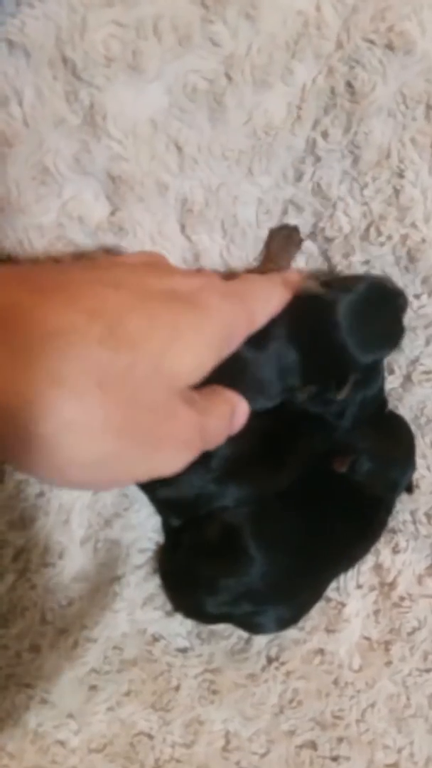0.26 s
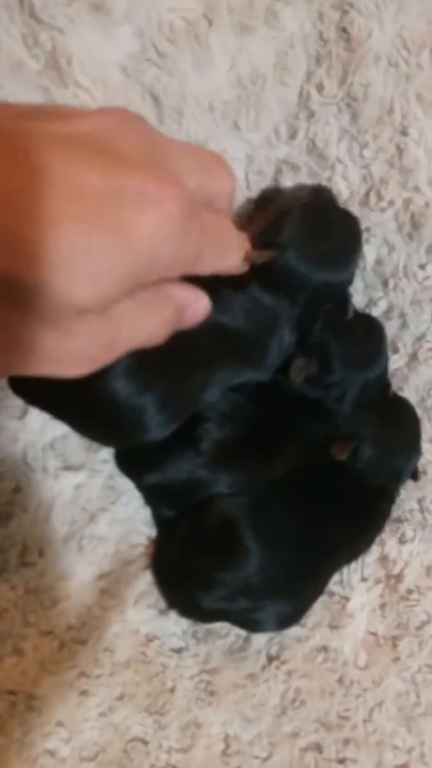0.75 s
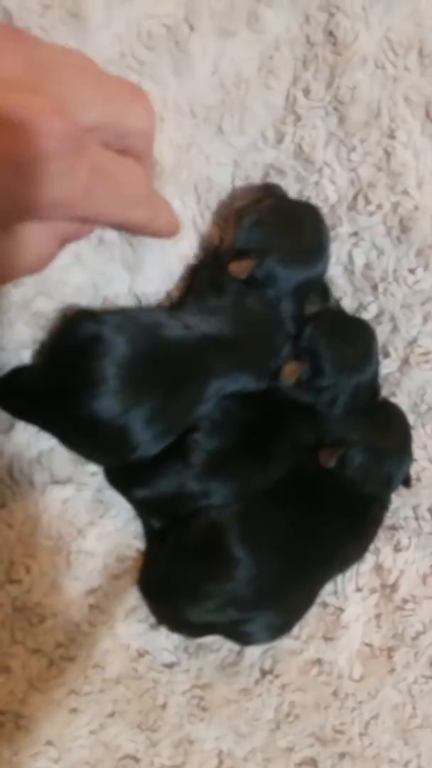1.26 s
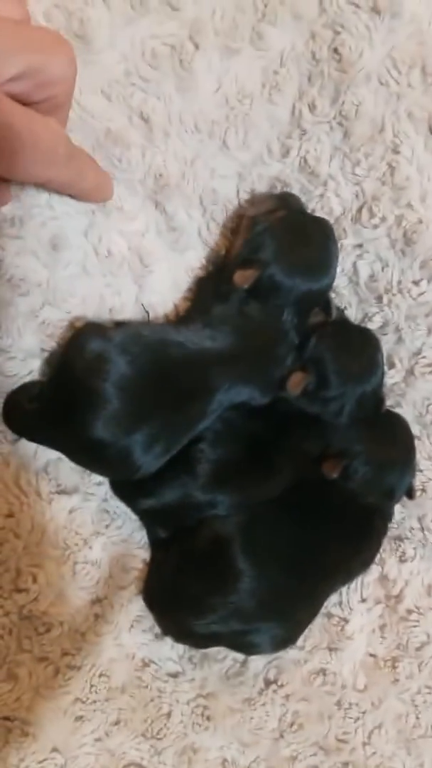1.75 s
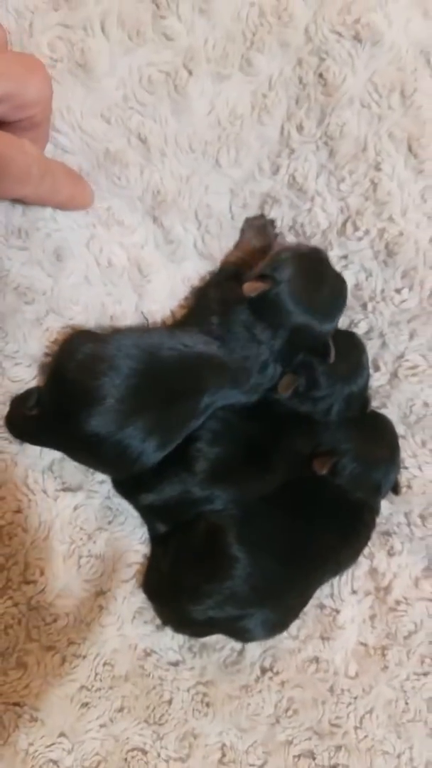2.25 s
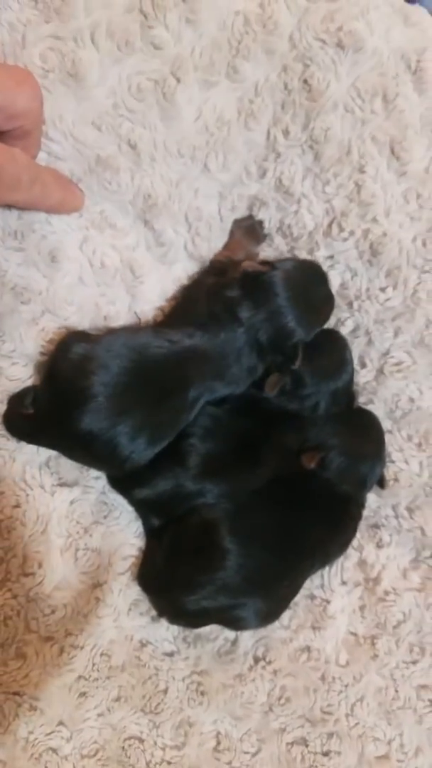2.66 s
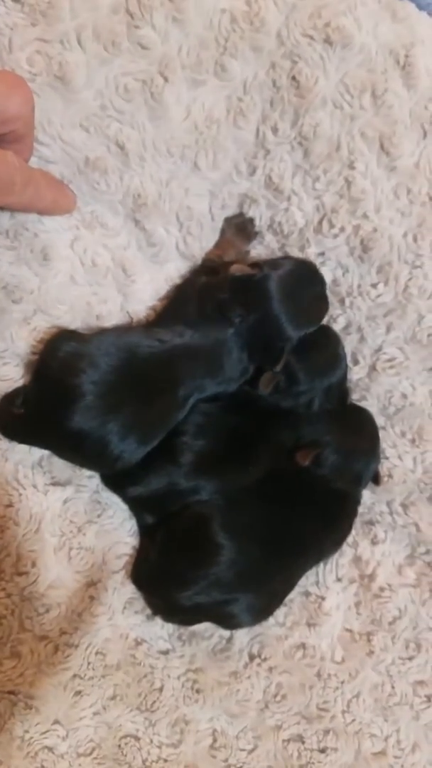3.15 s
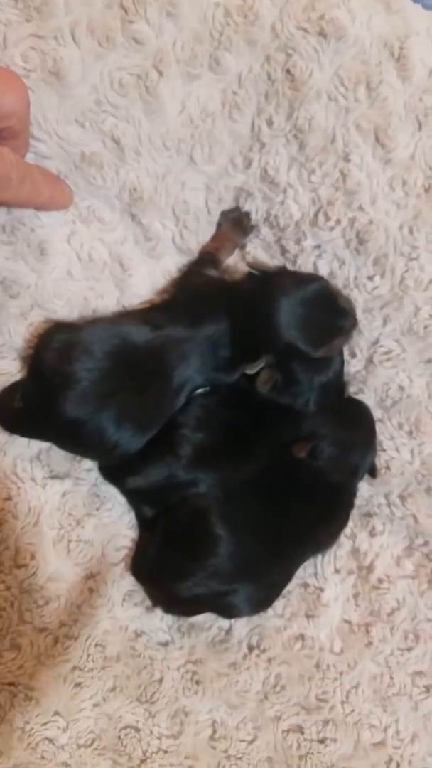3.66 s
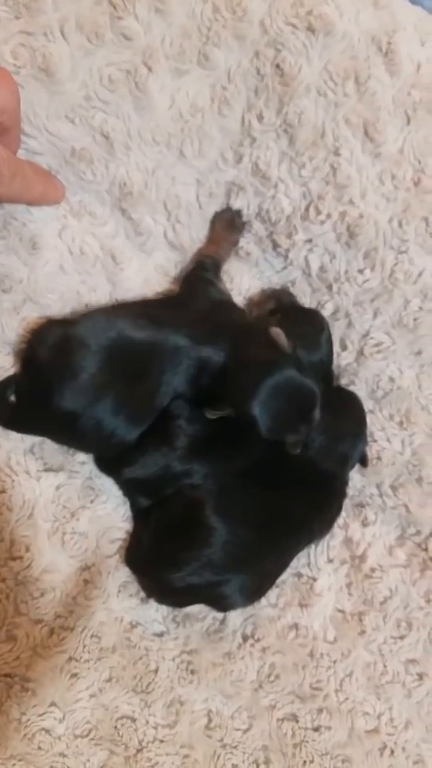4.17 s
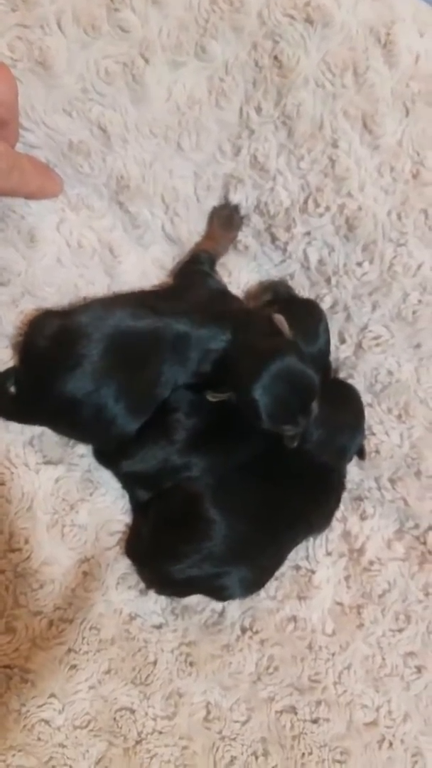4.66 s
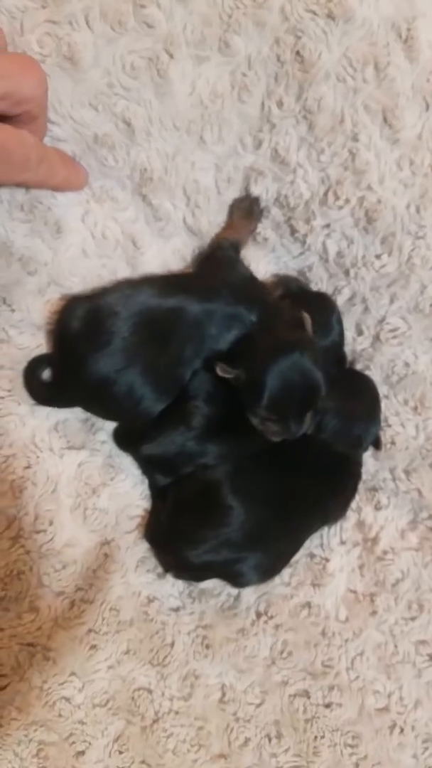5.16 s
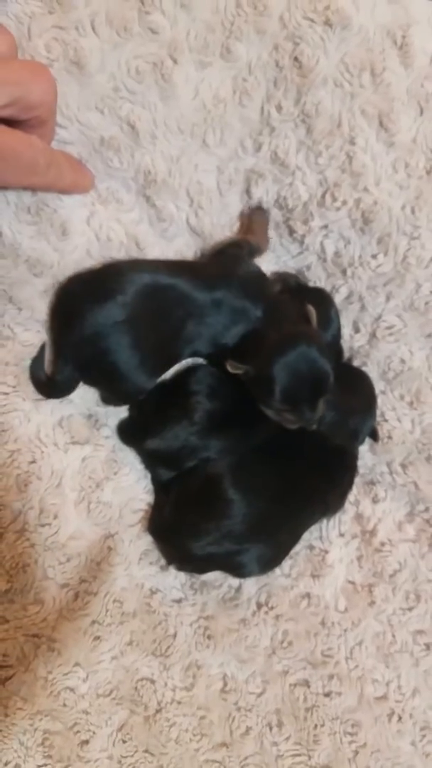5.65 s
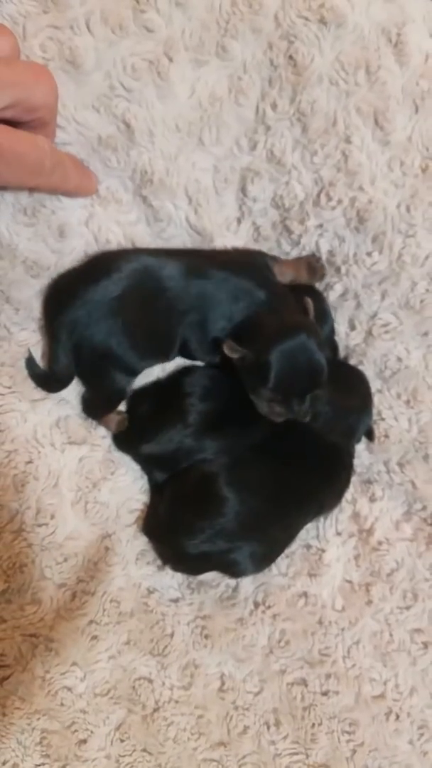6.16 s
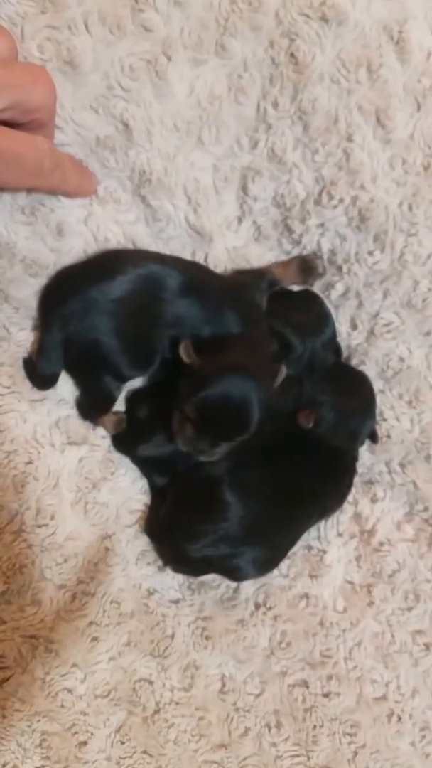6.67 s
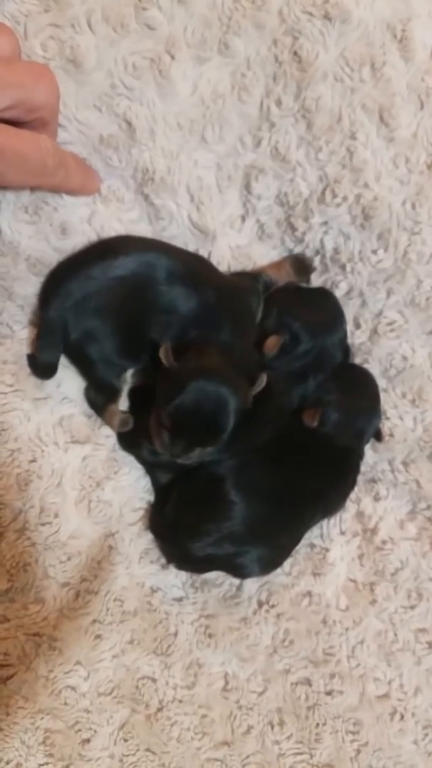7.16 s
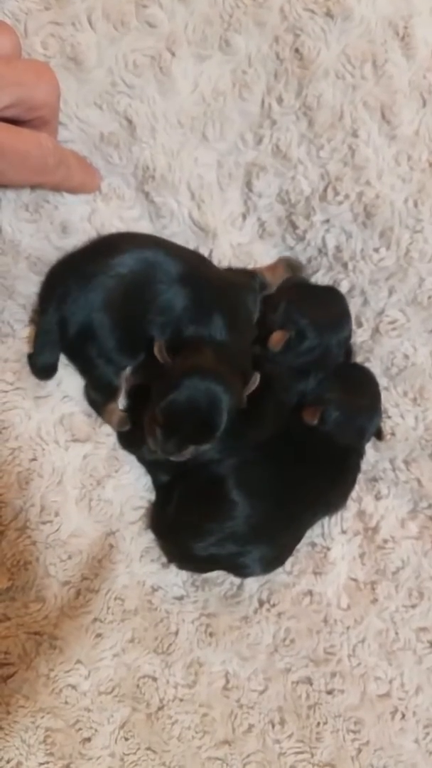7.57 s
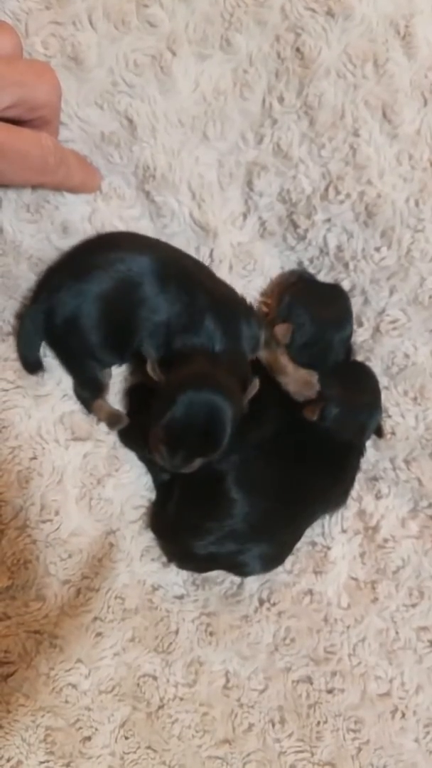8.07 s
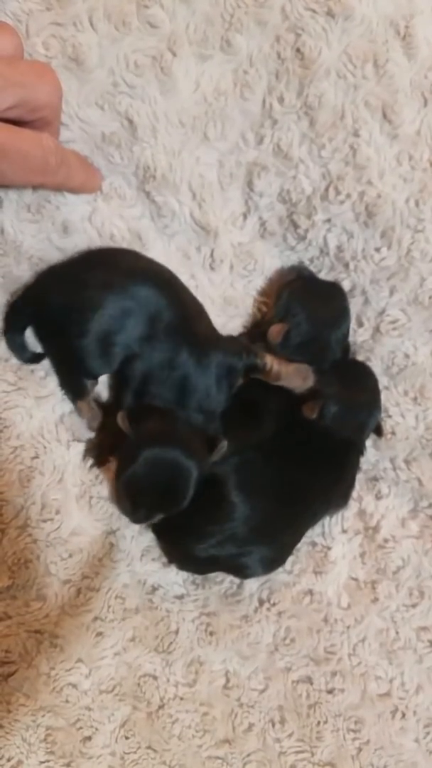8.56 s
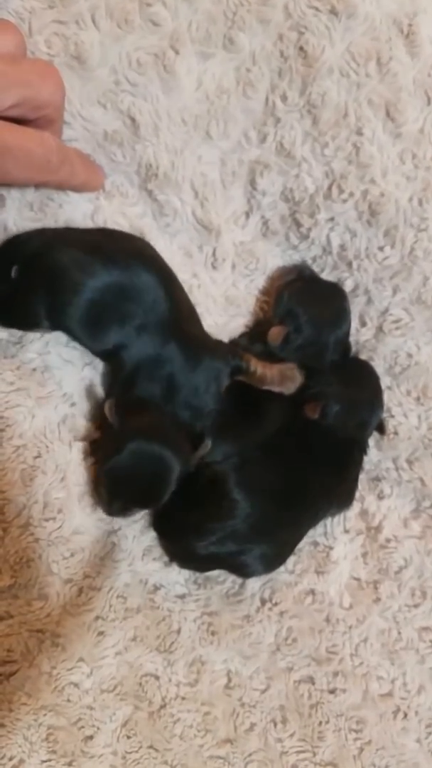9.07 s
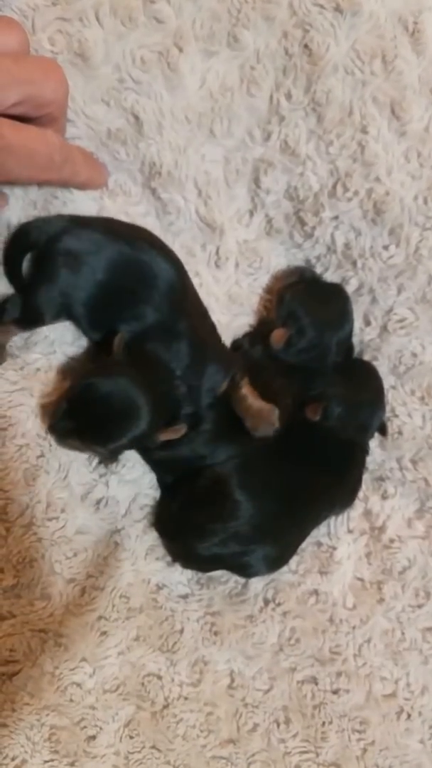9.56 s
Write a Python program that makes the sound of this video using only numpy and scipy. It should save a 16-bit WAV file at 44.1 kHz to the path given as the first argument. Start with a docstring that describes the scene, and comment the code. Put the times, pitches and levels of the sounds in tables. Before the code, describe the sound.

A newborn puppy is heard close up in a carpeted room with a short soft echo. From 0 to 2.8 s a hand brushes fur in light, uneven strokes, with clusters of small dull ticks from fingers on the handheld device, stronger on the right. The puppy gives faint, brief whimpers, then two trembling rising whines at 1.6 and 2.1 s. Quiet broken peeps follow from 3 to 5 s; a distant dog gives one reverberant bark at 3.3 s, and ticks return around 4.8-5.2 s. At 5.3 s a louder quavering cry begins, then a piercing upward squeal at 5.9-6.1 s. Further bark at 6.4 s, overlapping another whine. From 7.2 s strong arched cries come about twice a second, with tiny wet lip clicks between some. A last far bark sounds at 8.9 s; a fluttering whine ends near 9.8 s over slightly rising room rumble and hiss.

```python
"""A newborn puppy whimpers on a carpet just below a hand-held phone: short quavering cries, then louder arched ones.
Each cry is a source and a filter: puffs of air at the pitch of the vocal folds, coloured by an opening and shutting mouth.
A hand strokes the fur and lips click nearby, as filtered noise and damped tones; finger ticks on the phone are short pulses.
A grown dog barks three times from another room, mostly as reverberation built from decaying noise.
The room answers the cries, and its own tone is shaped noise over wavering hum."""
import sys
import numpy as np
from scipy import signal
from scipy.fft import rfft, irfft, next_fast_len
from scipy.io import wavfile
from scipy.ndimage import uniform_filter1d, map_coordinates

SR = 44100
rng = np.random.default_rng(int(sys.argv[2]) if len(sys.argv) > 2 else 0)


def put_to_file(sound):
    """Save the sound as 16-bit audio at rate SR, in the file named by the first command-line argument."""
    columns = np.atleast_2d(sound).T  # one column per channel
    safe = np.clip(columns, -1, 1)
    whole_steps = np.round(safe * 32767)
    wavfile.write(sys.argv[1], SR, whole_steps.astype(np.int16))


N = 433062
T = np.arange(N) / SR  # time in seconds


def amp(db):
    """The decibel law: pressure ratio of a level in dB."""
    return 10 ** (np.asarray(db) / 20)


def unit(x):
    """Normalisation by mean power: x at rms 1."""
    return x / np.sqrt(np.mean(x ** 2) + 1e-20)


def along(points, hz):
    """Linear interpolation of (Hz, value) points on a logarithmic frequency axis."""
    f, v = np.transpose(points)
    return np.interp(np.log(hz + 1), np.log(f + 1), v)


def wobble(rate):
    """Slow random fluctuation: a spline through normal random knots, rate of them a second."""
    coarse = T[::16]
    knots = rng.standard_normal(int(N * rate / SR) + 4)
    return np.interp(T, coarse, map_coordinates(knots, [coarse * rate]))


def filtered(x, response):
    """Linear filtering: the spectrum of x times a complex response of frequency."""
    m = next_fast_len(N + SR // 2)
    hz = np.fft.rfftfreq(m, 1 / SR)
    return irfft(rfft(x, m) * response(hz), m)[..., :N]


def causal(points):
    """Minimum phase: folding the cepstrum of (Hz, dB) points gives a response that never precedes its cause."""
    def response(hz):
        cepstrum = irfft(np.log(amp(along(points, hz))))
        half = len(cepstrum) // 2
        cepstrum[1:half] *= 2
        cepstrum[half + 1:] = 0
        return np.exp(rfft(cepstrum))
    return response


def steady(x, seconds):
    """Level equalisation: x divided by its running rms."""
    power = abs(uniform_filter1d(x ** 2, int(seconds * SR)))
    return x / np.sqrt(power + 1e-12)


def tail(t60_scale):
    """Diffuse reverberation: stereo noise decaying exponentially at its own speed in each band, unit energy on the left."""
    # Each row: frequency in Hz, time in seconds to fall 60 dB, before t60_scale.
    decay_times = [(300, 0.6), (3000, 0.45), (15000, 0.79)]
    hz, t, z = signal.stft(rng.standard_normal((2, SR // 2)), SR, nperseg=256)
    t60 = t60_scale * along(decay_times, hz)[:, None]
    ring = signal.istft(z * amp(-60 * t / t60), SR, nperseg=256)[1]
    return ring / np.linalg.norm(ring[0])


def room_tone():
    """Partly coherent noise: rumble and hiss, least alike at the two ports in the treble, over a wavering hum."""
    # Spectrum of the air noise. Each row: frequency in Hz, relative density in dB per Hz.
    air_colour = [(20, -50), (45, -19.5), (80, -12), (316, -10.5), (1780, -13.5), (3680, -19),
                  (6000, -22.5), (7800, -18.5), (10000, -23.5), (15700, -22)]
    # Course of the noise. Each row: time in seconds, rumble level in dB (60-200 Hz), hiss level in dB (5-12 kHz).
    air_level = [(0, -78, -75), (6, -75.5, -75), (9.82, -69, -71.5)]
    # Left-right coherence. Each row: frequency in Hz, correlation from 0 to 1.
    likeness = [(60, 0.72), (200, 0.55), (640, 0.6), (3000, .01)]
    # An appliance. Each row: frequency in Hz, nominal level in dB (shifted and wavering below).
    hum_tones = [(75, -81.5), (105, -78), (257, -75.5)]

    def mid_and_side(hz):
        # the cosine of twice this angle is the correlation of left and right
        angle = np.arccos(np.clip(along(likeness, hz), -1, 1)) / 2
        return amp(along(air_colour, hz)) * [np.cos(angle), np.sin(angle)]

    mid, side = filtered(rng.standard_normal((2, N)), mid_and_side)
    pair = np.array([mid + side, mid - side])
    low = filtered(pair, lambda hz: 1 / (1 + (hz / 300) ** 2))

    def band_rms(lo, hi):
        """Mean power of the noise pair between two frequencies in Hz, as an rms."""
        return np.std(filtered(pair, lambda hz: (hz > lo) & (hz < hi)))

    s, rumble_db, hiss_db = np.transpose(air_level)
    rumble = low / band_rms(60, 200) * amp(np.interp(T, s, rumble_db) + .8 * wobble(4))
    hiss = (pair - low) / band_rms(5000, 12000) * amp(np.interp(T, s, hiss_db) + .6 * wobble(3))
    hum = np.zeros(N)
    for hz, db in hum_tones:
        level = amp(db - 3.5 + 5.9 * wobble(12))
        hum += level * np.sin(2 * np.pi * hz * T + 1.3 * wobble(5.4))
    return rumble + hiss + hum


def rustle():
    """Friction noise: a hand strokes the puppy's fur in uneven strokes."""
    # Spectrum of the friction. Each row: frequency in Hz, relative density in dB per Hz.
    fur = [(700, -8.5), (2300, -2), (3700, -7), (6000, -11.5), (7900, -6.5), (15700, -26)]
    # Strength of the stroking. Each row: time in seconds, mean level in dB.
    strokes = [(0, -71), (.3, -77), (.6, -64), (.8, -76.5), (1.1, -71.5), (1.45, -65.5), (1.9, -73),
               (2.4, -61.5), (2.8, -99)]
    rub = unit(filtered(rng.standard_normal((2, N)), lambda hz: amp(along(fur, hz))))
    return rub * amp(np.interp(T, *np.transpose(strokes)) + 1.2 * wobble(3.7))


def folds(pitch_hz, fall, uneven_db, noisy, count):
    """Glottal source: harmonics each weaker by fall, blended with noise gated once a cycle."""
    turn = np.exp(2j * np.pi * np.cumsum(pitch_hz) / SR)
    drift = [amp(uneven_db * wobble(30)) for _ in range(5)]
    partial, puffs = turn, np.zeros(N)
    for k in range(1, count):
        puffs += partial.real * drift[k % len(drift)] * (k * pitch_hz < 16000)
        partial = partial * turn * fall
    gate = (.5 + .5 * turn.real) ** 2
    noise = 13.0 * gate * rng.standard_normal(N)
    return (1 - noisy) * puffs + noisy * noise, noise


def quaver():
    """Frequency modulation: the share by which the pitch swings about its contour."""
    # Spells of trembling pitch. Each row: start in seconds, end in seconds, time of a crest in seconds,
    # period in seconds, first swing and last swing as shares of the pitch.
    spells = [(1.627, 1.812, 1.642, .0513, .11, .07), (2.085, 2.36, 2.122, .051, 0.22, .05),
              (5.367, 5.619, 5.4, .049, 0.1, 0.08946), (6.416, 6.581, 6.432, .057, 0.1296, 0.067),
              (7.26, 7.461, 7.288, .053, .09, 0.067), (9.586, 9.775, 9.598, .053, .06, .1)]
    fade_s = .012
    swing = np.zeros(N)
    for start, end, crest, period, first, last in spells:
        fade = np.clip(np.minimum(T - start, end - T) / fade_s, 0, 1)
        depth = np.interp(T, [start, end], [first, last])
        swing += fade * depth * np.cos(2 * np.pi * (T - crest) / period)
    return swing


def puppy():
    """Source and filter: puffs at the pitch pass a mouth that opens and shuts; fold buzz and breath hiss above."""
    # One list per cry, without its quaver. Each row: time in seconds, fold pitch in Hz, level in dB.
    contours = [
        [(.053, 391.6, -49.5), (.078, 359, -51.5), (.127, 437, -46.5), (.152, 429, -52.5)],
        [(.435, 475.6, -59), (.46, 412, -52.5), (.5, 337.6, -49), (.54, 418.6, -46), (.56, 414.4, -47.5),
         (.593, 462.5, -43), (.609, 451, -55), (.62, 466, -46)],
        [(.918, 356, -52.5), (.958, 338.3, -52.5), (.97, 376.6, -52.5), (.99, 355, -53.5), (1.006, 366, -52)],
        [(1.6, 374.4, -62.5), (1.634, 395, -53), (1.7, 398.7, -46), (1.744, 455, -41), (1.81, 510.6, -42.5),
         (1.826, 400, -43), (1.85, 332, -49.5)],
        [(2.08, 330, -54), (2.122, 445, -47.5), (2.18, 505.5, -42), (2.256, 570.6, -38), (2.348, 627, -37.5),
         (2.362, 594, -39), (2.378, 534, -49)],
        [(2.955, 540, -54.5), (2.977, 490, -54.5), (3.001, 491, -55.5), (3.021, 404, -52),
         (3.059, 507.6, -48.5), (3.073, 478, -51.5), (3.087, 450, -67)],
        [(3.36, 420, -58), (3.385, 394, -56.5), (3.4, 436, -50), (3.424, 429, -53.5), (3.475, 354, -52.5),
         (3.5, 334.5, -57)],
        [(4.102, 902, -51.5), (4.156, 957, -56.5), (4.16, 467, -52), (4.206, 449, -52.5), (4.238, 393.5, -47.5),
         (4.256, 331.3, -48.5), (4.272, 340, -74)],
        [(4.53, 913, -51), (4.554, 893, -52), (4.558, 548, -51), (4.578, 471, -50.5), (4.62, 407.4, -46),
         (4.664, 438, -43.5), (4.684, 397, -45.5), (4.705, 372, -54)],
        [(4.975, 910, -54), (4.998, 862, -53.5), (5.016, 538, -55), (5.04, 739, -69)],
        [(5.315, 600, -53), (5.33, 523.3, -49.5), (5.35, 479.5, -44.5), (5.387, 420.7, -39.5),
         (5.423, 425, -38.5), (5.501, 475.5, -32.5), (5.593, 494.8, -31), (5.62, 473, -43.5)],
        [(5.853, 798, -45.5), (5.877, 834, -31.5), (5.899, 990, -32), (5.977, 1472, -24.5), (6.065, 1637, -19),
         (6.083, 1499, -28), (6.105, 1054, -32), (6.119, 1050, -29.5), (6.14, 848, -36)],
        [(6.338, 326, -42), (6.358, 410.7, -44.5), (6.378, 403.3, -37.5), (6.415, 492.4, -36),
         (6.44, 459.2, -35.5), (6.604, 471.8, -32.5), (6.646, 567.7, -31.5), (6.675, 408.5, -46)],
        [(6.925, 406, -48.5), (6.943, 418, -44), (6.978, 382.8, -43.5), (7.0, 415.7, -54.5)],
        [(7.242, 468, -43.5), (7.254, 457, -50), (7.29, 442, -41.5), (7.36, 510, -37), (7.452, 549.7, -33.5),
         (7.478, 570.5, -31), (7.496, 456.5, -46.5), (7.515, 411, -41)],
        [(7.7, 504, -50), (7.71, 496, -59.5), (7.734, 582, -39.5), (7.762, 668, -38), (7.784, 811, -34.5),
         (7.826, 871.5, -27.5), (7.88, 564.6, -31.5), (7.928, 398.5, -45)],
        [(8.115, 676, -50.5), (8.142, 626, -41), (8.159, 743, -35.5), (8.215, 851.5, -26), (8.249, 714, -30.5),
         (8.279, 550.6, -32.5), (8.33, 483.7, -38.5), (8.352, 505, -49)],
        [(8.553, 475, -51.5), (8.579, 516.4, -48), (8.607, 515, -43.5), (8.629, 750, -36.5), (8.679, 834, -30),
         (8.709, 787, -30.5), (8.742, 684, -29.5), (8.767, 491.6, -41), (8.79, 507, -58)],
        [(9.0, 434, -47), (9.056, 796, -32), (9.1, 955, -27.5), (9.132, 1019, -29), (9.156, 1201, -35.5),
         (9.176, 1149, -34.5), (9.194, 920, -26), (9.208, 693, -28), (9.225, 572.3, -37.5)],
        [(9.456, 430, -48), (9.474, 390.4, -41.5), (9.508, 485.4, -39), (9.532, 521.8, -36),
         (9.55, 514.6, -37.5), (9.594, 601, -31), (9.7, 603, -32.5), (9.76, 528.4, -34), (9.782, 435, -37.5),
         (9.8, 447, -63)],
    ]
    # One row per cry: time in seconds when the lips start to shut, widest mouth from 0 to 1, gain in dB near
    # 2.6 kHz, gain in dB near 3.8 kHz and treble in dB relative to the level (both before effort and lips).
    cries = [(0.137, 0.89, 2, -7, -17), (.602, 0.79, 7, -13, -21), (.99, 0.55, 8, 1, -15),
             (1.808, 0.77, 1, 3, -18), (2.353, 0.86, -1.5, 3, -23), (3.069, 0.71, 3.5, -7, -22),
             (3.478, 0.74, 1.5, 1, -23), (4.255, 0.86, 1.5, 0.5, -37), (4.675, 0.85, -6, -6.5, -27),
             (5.015, 0.85, 0, 1, -32), (5.603, 0.96, 1, 0, -25.5), (6.097, 0.98, 4.5, 1.5, -37.5),
             (6.652, 0.97, 0.5, 4, -24.5), (6.958, 0.58, 2, -8, -18.5), (7.481, .95, -2, 4, -22.5),
             (7.905, 0.89, 4.5, 6, -24.5), (8.328, 0.92, 1, 9, -19.5), (8.752, 0.78, 1.5, 8, -28),
             (9.197, .8, 6, 4, -26.5), (9.764, .88, -0.5, 8, -17)]
    # The voice breaks into noise. Each row: centre in seconds, width in seconds (at 1/e), added noise share 0-1.
    breaks = [(0.452, 0.02017, 0.41), (1.614, .03, 0.77), (2.084, 0.021, .2), (5.005, 0.033, .3),
              (5.418, .024, 0.53), (6.091, .014, 0.28), (6.988, 0.01846, .9), (7.243, 0.013, .5),
              (7.721, .015, .4), (8.136, 0.018, 1), (9.011, 0.018, 0.5)]
    # Throat and mouth with lips nearly shut, then wide open. Each row: frequency in Hz, relative gain in dB.
    shut_mouth, open_mouth = [(100, -73), (250, -6), (400, 0.5), (800, 5.5), (1100, 0.5), (1650, -21.5),
                              (2500, -9.5), (3300, -16.5), (5300, -21), (15700, -36.5)], [(100, -66.5), (250, -12.5), (450, -21.5), (900, -11.5),
                                            (1400, -3.5), (1900, 0), (2500, -12), (3100, -22), (3800, -20),
                                            (4300, -24.5), (5000, -31.5), (5800, -22.5), (8200, -66.5),
                                            (15700, -65)]
    # Colour of the high buzz of the puffs. Each row: frequency in Hz, relative gain in dB.
    buzz_colour = [(4000, -39.5), (5800, -24), (7300, 1.5), (8700, 0), (9960, -10.5), (11300, -4.5),
                   (12700, -18), (15000, -10), (15700, 1.5)]
    open_s, open_from = 0.12, 0.94  # widening time, from this share of the widest
    shut_s, shut_to = 0.017, .06  # shutting time, down to this share
    shut_dull_db = -7  # shut lips muffle the upper partials
    puff_db, puff_s = -15.5, 0.013  # air escapes as the lips meet
    quaver_db = 12  # level change per unit of swing
    hollow = .65  # share a side pocket of the throat takes out near 5.4 kHz

    level, mouth, cheek, facing, treble, puff = np.zeros((6, N))
    for contour, (shut_at, widest, cheek_db, facing_db, treble_db) in zip(contours, cries):
        s, _, db = np.transpose(contour)
        span = slice(round(s[0] * SR), round(s[-1] * SR))
        t = T[span]
        shut = np.clip((t - shut_at) / shut_s, 0, 1)
        opening = np.interp(t, [s[0], s[0] + open_s], [open_from, 1]) * (1 - (1 - shut_to) * shut)
        mouth[span] = np.clip(widest * opening, 0, 1)
        edge = np.clip(np.minimum((t - s[0]) / 0.0027, (s[-1] - t) / 0.0022), 0, 1)
        level[span] = edge * amp(np.interp(t, s, db))
        effort_db = np.interp(t, s, db - db.max())  # a harder push sharpens the puffs
        cheek[span] = amp(cheek_db)
        facing[span] = amp(facing_db + 0.18 * effort_db + shut_dull_db * shut)
        treble[span] = amp(treble_db + shut_dull_db * shut)
        puff[span] = amp(puff_db) * np.exp(-(2 * (t - shut_at - shut_s / 2) / puff_s) ** 2)

    swing = quaver()
    level = level * amp(quaver_db * swing)
    pitch = np.interp(T, *np.concatenate(contours).T[:2])
    pitch = uniform_filter1d(uniform_filter1d(pitch, size=330), size=330)  # the folds round off each turn
    pitch = pitch * (1 + swing + 0.0056 * wobble(150))

    slack = np.clip(550 / pitch, 0, 1) ** 2.0  # slack folds flutter and leak more
    noisy = 0.079 * slack
    for s, length, share in breaks:
        noisy += share * np.exp(-(2 * (T - s) / length) ** 2)
    # tightly stretched folds barely close, so high cries are purer
    fall = amp(-8 * np.clip(np.log2(pitch / 1000), 0, 2))
    air, breath = folds(pitch, fall, 2.2, np.clip(noisy, 0, 1), count=38)
    air = air * amp(1.5 * slack * wobble(200))
    voice = mouth * filtered(air, causal(open_mouth)) + (1 - mouth) * filtered(air, causal(shut_mouth))

    def bands(hz):
        above = [1 / (1 + (edge_hz / (hz + 1)) ** 10) for edge_hz in (2200, 3050, 4500, 6600)]
        return -np.diff(above, axis=0)

    def breath_bands(hz):
        return np.exp(-((hz - np.c_[[3400, 2300]]) / np.c_[[900, 1300]]) ** 2)

    # the upper partials beam forward, so they follow the turn of the head
    middle, upper, pocket = filtered(voice, bands)
    leak, escape = map(unit, filtered(breath, breath_bands))
    shaped = voice + (cheek - 1) * middle + (facing - 1) * upper - hollow * pocket
    voice = steady(shaped, 0.0068)
    voice = voice + amp(-27) * facing * slack * leak + puff * escape
    buzz = steady(filtered(air + 0.14 * breath, causal(buzz_colour)), 0.03)
    return level * -(voice + treble * buzz)


def ticks():
    """Impulsive contact: each finger tick is a short push on the case with a sharp edge, stronger at the right port."""
    # The clearest finger ticks. Each row: time in seconds, nominal level in dB (2 dB comes off below).
    clear_ticks = [(0.781, -42.5), (0.8154, -41.5), (0.866, -40.5), (0.9037, -42), (.9873, -43),
                   (1.9312, -43.5), (2.0078, -41.5), (2.331, -39.5), (2.463, -41), (2.5664, -42),
                   (2.9225, -47), (3.191, -44), (4.7965, -42.5), (4.849, -43.5), (4.91, -44), (4.9687, -43),
                   (5.0386, -42), (5.156, -45.5)]
    # Spells of fainter ticks. Each row: start in seconds, end in seconds.
    regrips = [(1.89, 1.96), (2.5, 2.66), (4.75, 5.1)]
    faint_db, faint_gap_s = -48, .06  # nominal level and mean spacing
    faint = []
    for start, end in regrips:
        for s in np.arange(start, end, faint_gap_s):
            faint.append((s + faint_gap_s * rng.random(), faint_db))
    events = clear_ticks + faint
    sound, t = np.zeros(N + SR), np.arange(-300, 300) / SR
    for (s, db), scatter in zip(events, rng.standard_normal((len(events), 2))):
        u = t * 310 * amp(1.2 * scatter[0])  # cycles of the push, near 310 Hz
        push = -np.sin(2 * np.pi * u) * np.exp(-(u / 0.33) ** 2)
        edge = amp(-4 + 2 * scatter[1]) * np.exp(-(t / .0002) ** 2)
        sound[round(s * SR) - 300:][:len(t)] += amp(db - 2) * (push + edge)
    return sound[:N] * amp([[-8], [0]])  # left, right


def smacks():
    """Damped oscillation: small wet clicks near 2.2 kHz as the lips part."""
    # Partings of the lips. Each row: time in seconds, nominal level in dB (8.5 dB is added below).
    partings = [(2.061, -51.5), (2.6732, -61), (3.3114, -60), (5.0946, -58.5), (5.8, -57), (6.9087, -54),
                (7.2195, -54), (8.0949, -54)]
    sound, t = np.zeros(N + SR), np.arange(300) / SR
    for (s, db), scatter in zip(partings, rng.standard_normal((len(partings), 1))):
        decay = amp(db + 8.5 - 60 * t / 0.0045)  # falls 60 dB in 4.5 ms
        click = decay * np.sin(2 * np.pi * 2200 * amp(1.6 * scatter) * t)
        sound[round(s * SR) - 20:][:len(t)] += click
    return sound[:N]


def far_dog():
    """Reverberant field: hoarse barks through muzzle resonances arrive mostly as reverberation."""
    # Each row: start in seconds, nominal level in dB, length in seconds, nominal pitch in Hz, mouth resonance in Hz.
    barks = [(3.33, -42.5, 0.18, 406.3, 780), (6.368, -42.5, .16, 605.4, 636),
             (8.855, -41.5, 0.162, 608.3, 618)]
    # Upper resonances of the muzzle. Each row: frequency in Hz, width in Hz, gain in dB.
    upper_modes = [(1150, 300, -4), (1700, 280, -3)]
    sound = np.zeros((2, N))
    for s, db, length, hz, mouth_hz in barks:
        modes = [(mouth_hz, 380, 0)] + upper_modes

        def muzzle(f):
            resonances = 0
            for k, (centre, width, gain_db) in enumerate(modes):
                damping = 1j * f * width
                resonances = resonances + (-1) ** k * amp(gain_db) * damping / (centre ** 2 - f * f + damping)
            return resonances / (1 + (f / 2100) ** 6) / (1 + (350 / (f + 1)) ** 4)

        u = np.clip((T - s) / length, 0, 1)  # progress through the bark
        air = folds(hz * (1.03 - 0.0501 * u), 0.68, 3.1, 0.52, count=6)[0]
        bark = amp(db) * np.sin(np.pi * u) * unit(filtered(air, muzzle))
        sound += .8 * bark + signal.fftconvolve(bark[None], tail(1.1), axes=1)[:, :N]
    return sound


def scene():
    """Superposition: the near puppy reaches the two ports unequally and rings on in the room, among the other sounds."""
    # The puppy at the two ports. Each row: frequency in Hz, left minus right in dB.
    balance = [(60, -14.5), (700, 0), (1290, -7.5), (4400, -7), (8120, 1.5), (15000, -3.5)]
    # Phase between the ports. Each row: frequency in Hz, lead of the left in radians.
    lead = [(100, 0), (1380, -.25), (2070, .35), (3700, 1.), (6030, 1.45), (15700, 1.75)]
    cry = puppy() + smacks()
    sides = np.array([[.5], [-.5]])  # half of each difference goes to either port

    def ports(hz):
        return amp(sides * along(balance, hz)) * np.exp(1j * sides * along(lead, hz))

    direct = filtered(cry, ports)
    delayed = np.pad(cry, (400, 0))  # samples, about 9 ms
    answer = signal.fftconvolve(delayed[None], tail(1.0), axes=1)[:, :N]
    return direct + amp(-9) * answer + far_dog() + ticks() + rustle() + room_tone()


def record(dry):
    """Band limitation: the phone keeps nothing above its top frequency and sits slightly off zero."""
    top_hz = 15780
    return filtered(dry, lambda hz: hz < top_hz) - .0005


dry = scene()
out = record(dry)
put_to_file(out)
```